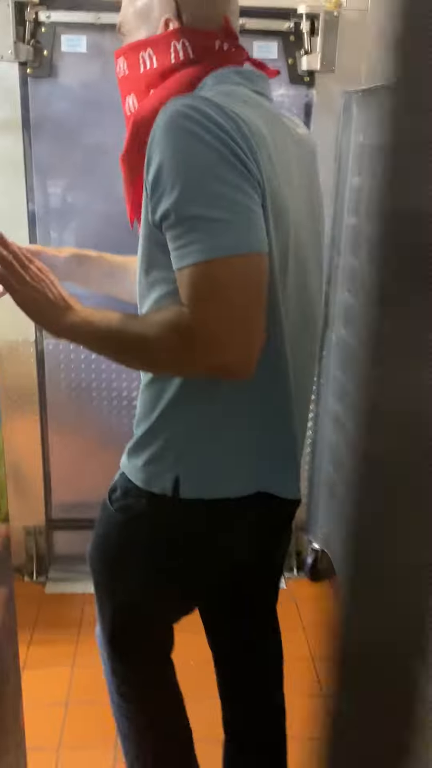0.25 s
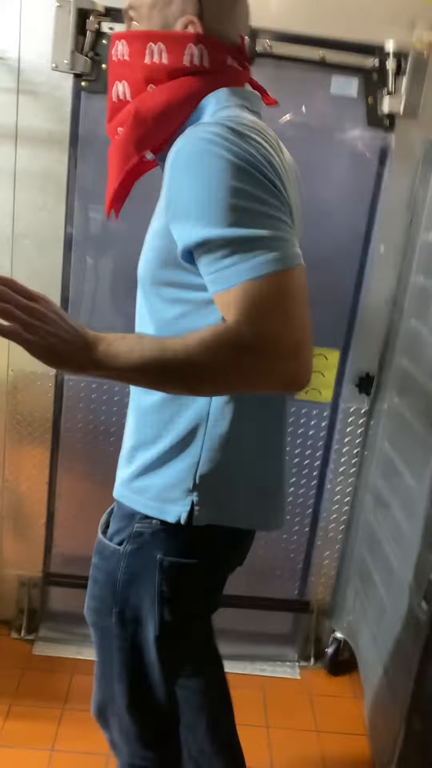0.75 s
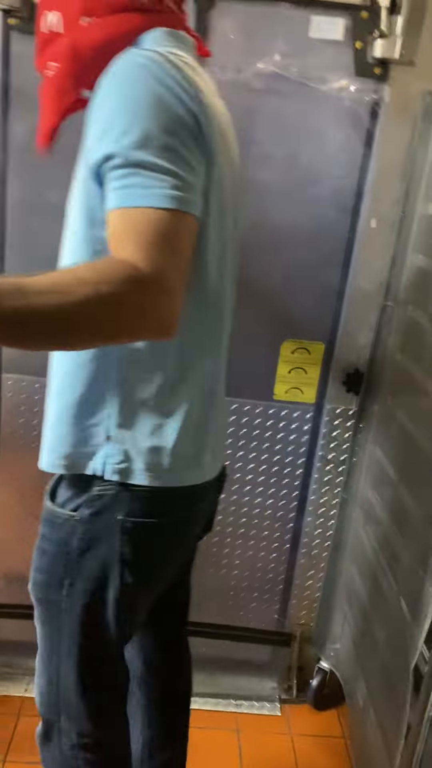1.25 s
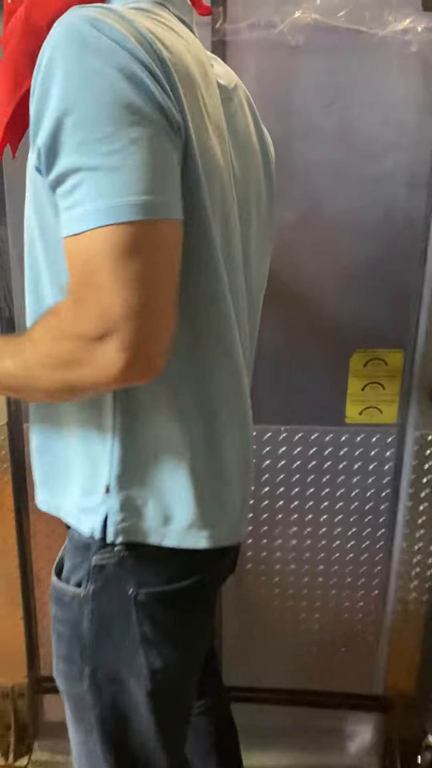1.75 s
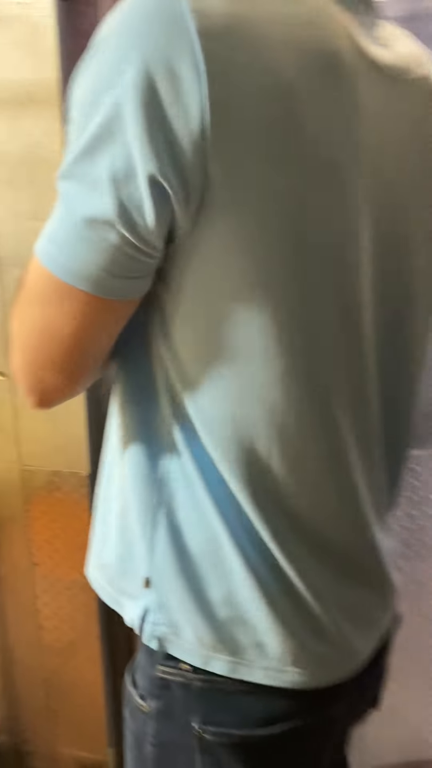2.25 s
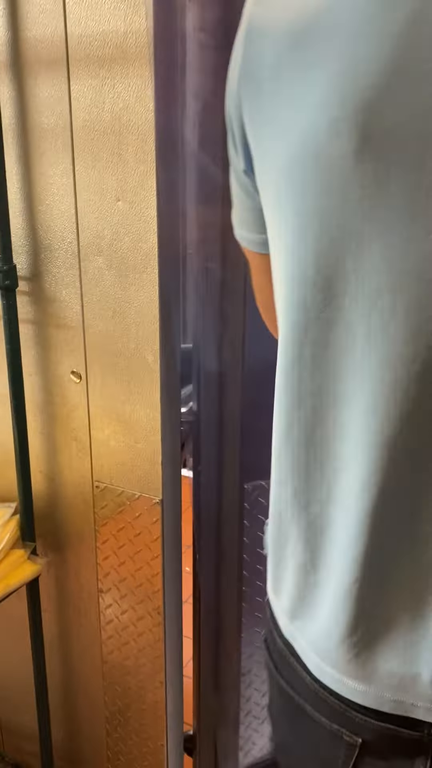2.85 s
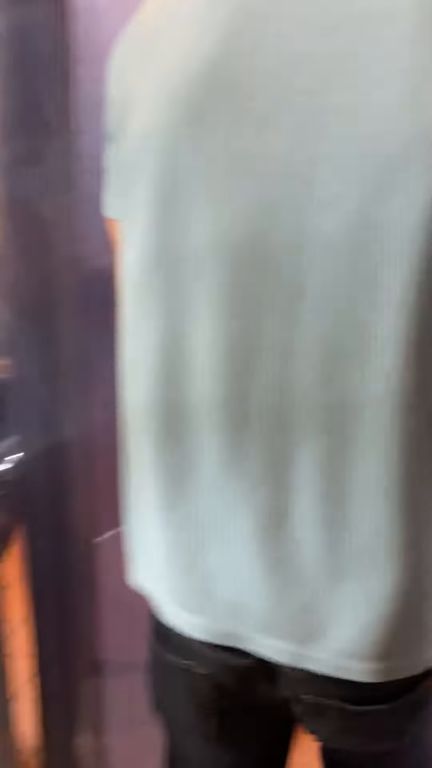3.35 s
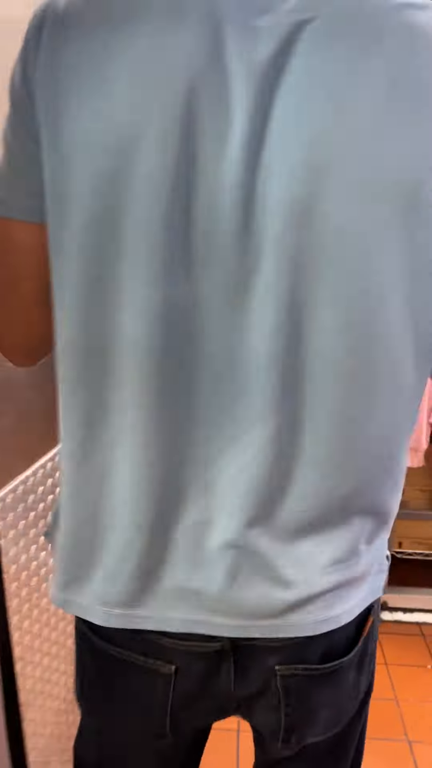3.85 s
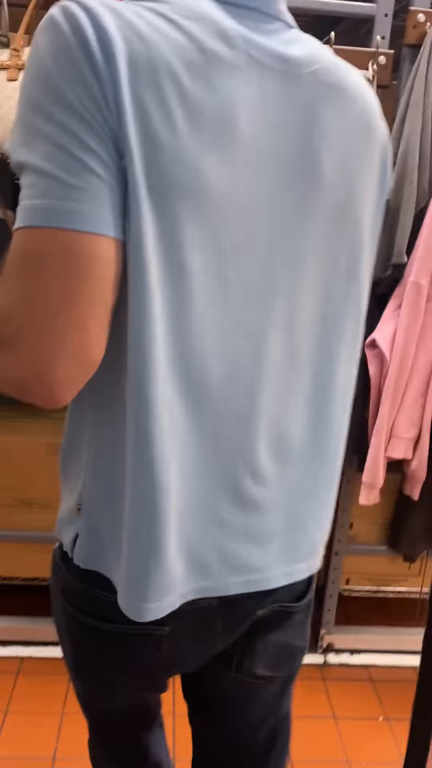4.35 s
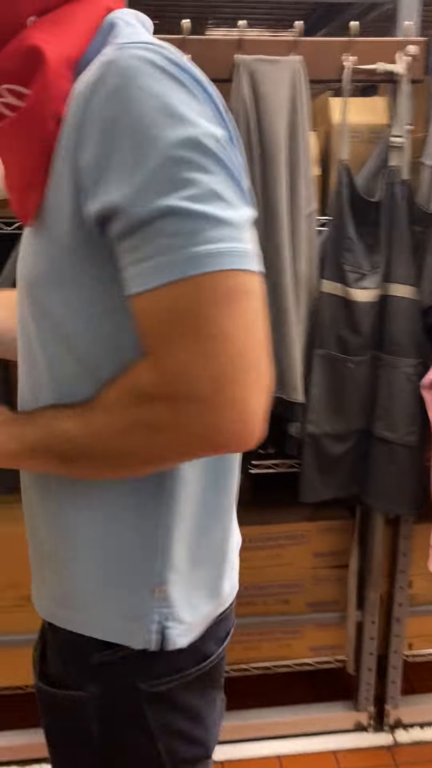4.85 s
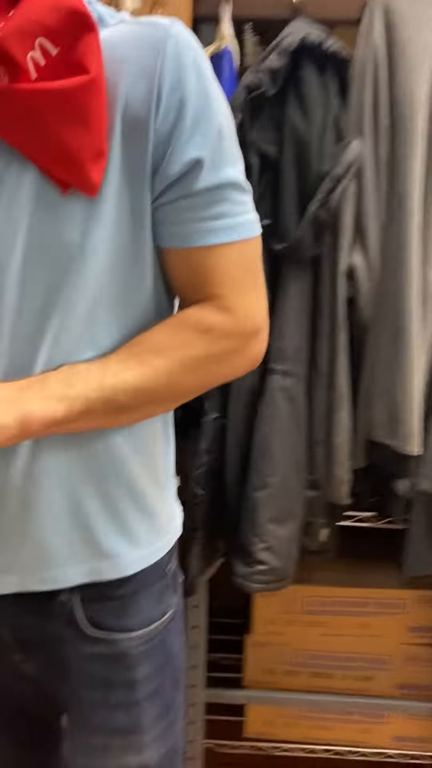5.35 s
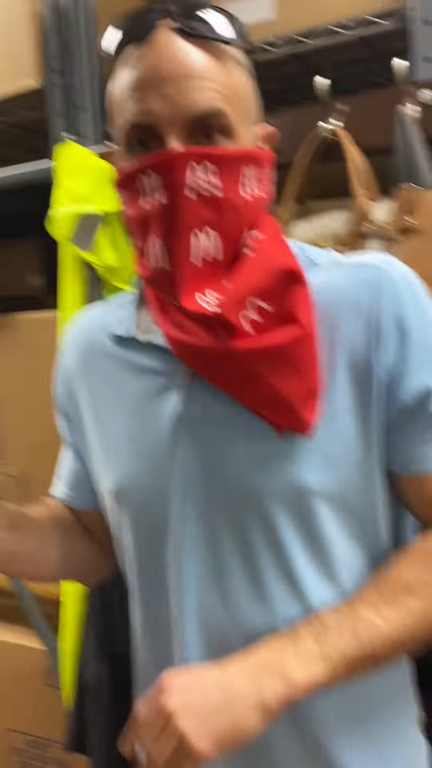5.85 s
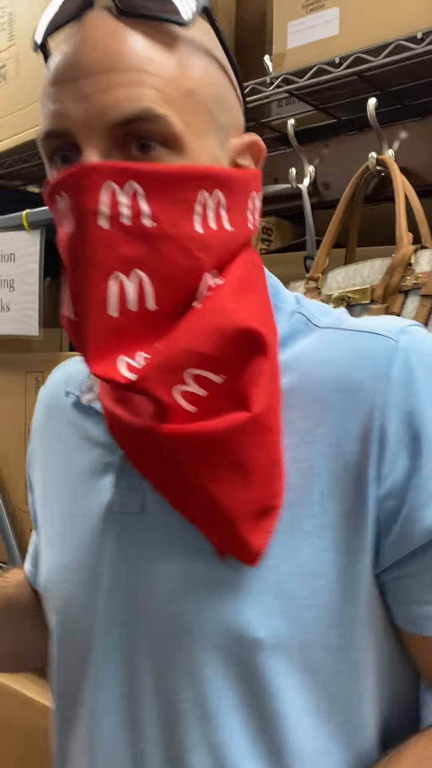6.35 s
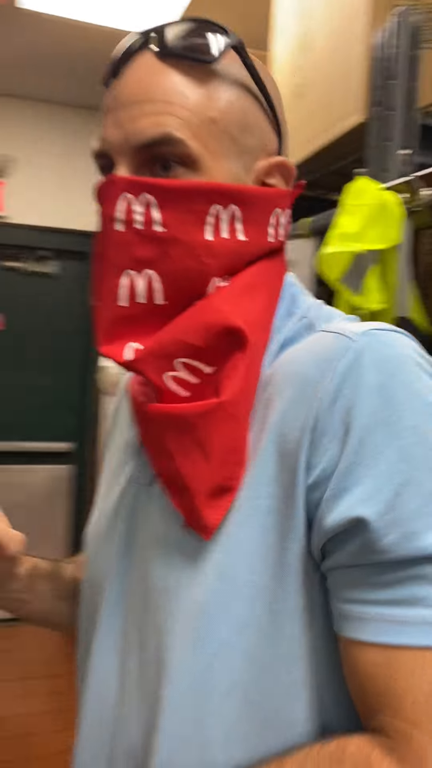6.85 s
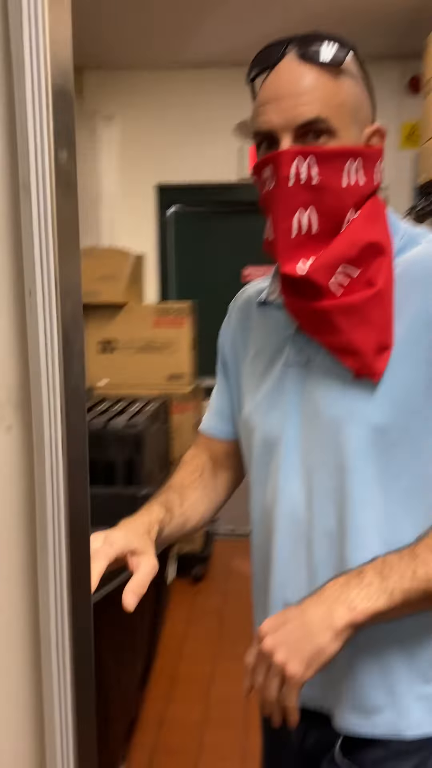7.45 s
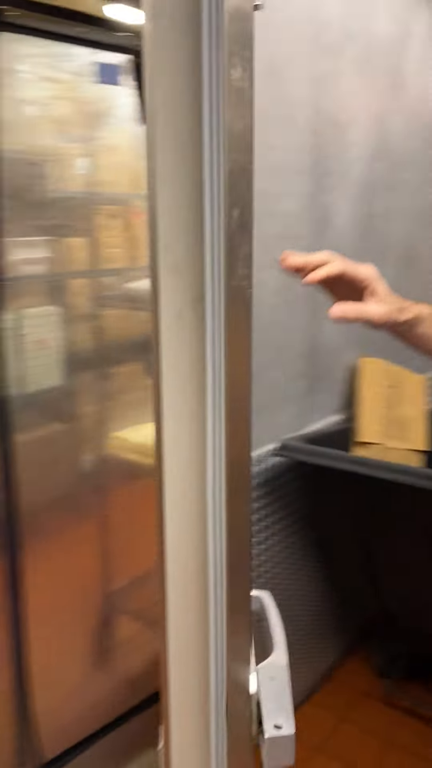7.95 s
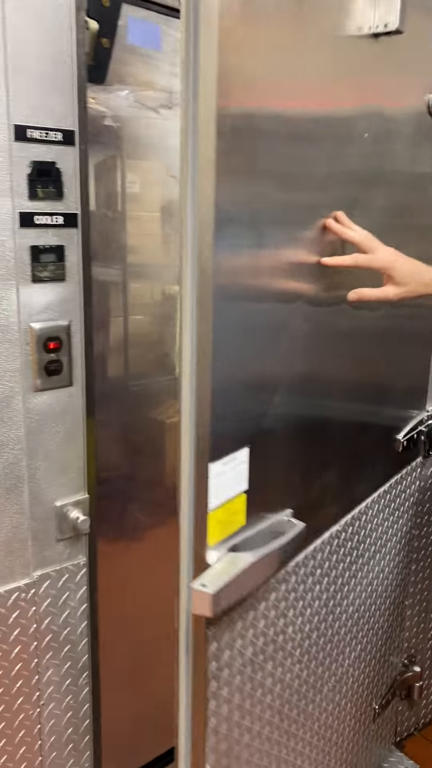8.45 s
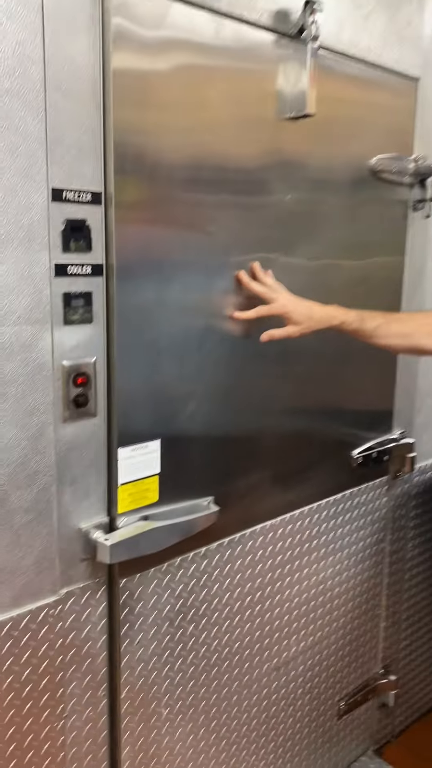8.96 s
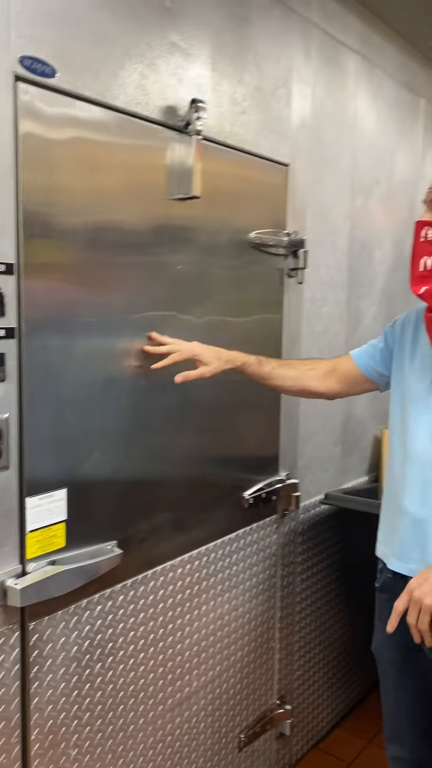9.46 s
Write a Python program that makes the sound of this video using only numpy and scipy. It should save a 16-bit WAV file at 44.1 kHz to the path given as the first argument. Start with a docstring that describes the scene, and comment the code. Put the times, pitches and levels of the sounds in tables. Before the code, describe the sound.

Steady low refrigeration hum with airy hiss, scattered door clanks, scuffs and ticks, then duller compressor throb and a heavy metal door booming closed.

```python
"""Evaporator fans and their motors hum in a walk-in freezer: wavering tones over banded noise for the air.
Someone pushes the heavy door open and walks out; struck hardware clanks through its own resonances and rings,
a hinge sings, shoes scuff and small things tick. With distance the hum and air roar fade, the compressors' beating
lines throb louder and faint machine whines come and go in the storeroom.
At the end the steel door swings shut and latches with a thump from its booming panel."""
import sys
import numpy as np
from scipy import signal
from scipy.fft import rfft, irfft, next_fast_len
from scipy.io import wavfile
from scipy.ndimage import uniform_filter1d

SR = 44100
rng = np.random.default_rng(int(sys.argv[2]) if len(sys.argv) > 2 else 0)


def store_pcm(level_fs):
    """Save levels as 16-bit WAV."""
    pcm = np.round(np.clip(level_fs, -1, 1) * 32767).astype(np.int16)
    wavfile.write(sys.argv[1], SR, np.atleast_2d(pcm).T)


N = 427769
TIME = np.arange(N) / SR
EDGES = np.geomspace(22, 17000, 26)  # borders of the noise bands, Hz
CENTRES = np.sqrt(EDGES[1:] * EDGES[:-1])
BLOW_SIZE = SR // 2  # samples kept of each blow
SHUT_S = 8.914  # the door meets its seal

# share of the storeroom in what the microphone hears: (time [s], share [0-1])
STOREROOM_SHARE = [(0, 0.02), (3.0, 0), (4.5, 0.04), (6.0, 0.92), (9.7, 1)]
# blows on the door hardware, treble against the middle:
# (time [s], relative level [dB], treble [dB], rise [s], part)
CLANKS = [ (0.209, -27.5, -12, 0.00081, "hinge pin"), (1.245, -13, -3, 0.0046, "frame"),
          (1.336, -24.5, -4.5, 0.0008, "push bar"), (1.350, -33.5, 4, 0.001, "push bar"),
          (1.363, -31, -2, 0.001, "push bar"), (2.042, -24, -13, 0.0021, "door skin"),
          (4.707, -22.5, -3, 0.008, "frame"), (4.750, -22, -0.5, 0.0011, "door edge"),
          (5.423, -26.5, 2, 0.0095, "frame"), (5.511, -23, 6, 0.00077, "handle"),
          (8.717, -22, 5, 0.0008, "closer"), (8.758, -24.5, -6.5, 0.00071, "closer"),
          (8.911, -19.5, -8.5, 0.0008, "latch"), (9.159, -22.5, -8, 0.00092, "bolt")]
# modes of the door's steel skin: (frequency [Hz], level against the blow [dB], t60 [s])
STEEL = [(1561, -22, .28), (2300, -16, .28), (2940, -19, 0.33), (3548, -17, 0.28), (4436, -26, .28),
         (5782, -24, .24), (6150, -23, .22), (7500, -24, 0.14)]


def fan_tones(fade_db):
    """Motor hum, blade tones and the shaken casing, screened by the wall outside and then by the shut door."""
    # blade tones of the fans: (multiple of the blade rate, level against the tone level [dB])
    blade_orders = [(1, 4.5), (3, -10), (4, -16)]
    # second blade tone, swelling and sinking through the room's standing waves:
    # (time [s], level against the tone level [dB])
    second_blade = [(0, -9), (.25, -0.5), (.5, -4), (.7, 0.5), (1.0, -0.5), (1.2, -9), (1.75, -9),
                    (2.1, -3.5), (2.65, 0), (3.2, -3.5), (3.55, -11), (3.95, -12), (4.25, 0), (4.9, -6.5),
                    (5.2, 5.5), (6.2, -2.5), (7.9, -6.5), (8.4, -2)]
    # evaporator casing, shaken by the motors: (frequency [Hz], level against the tone level [dB])
    casing_lines = [(48.5, -12.5), (73.2, -8), (92.7, -11), (147.5, -8), (281, -14.5), (315.2, -11),
                    (342.0, -11), (523, -25)]
    hum_hz, blade_hz = 120.0, 136.7
    # levels deep inside the freezer, dB; the hum loses more dB than the hiss does
    hum_inside_db, hum_follows, tones_inside_db = -14, 1.69, -31.5
    # further loss once outside, dB
    hum_wall_db, tones_doorway_db = -9.5, -5.5
    # the shut door muffles the tones: loss in dB, time the gap takes to close in s
    seal_db, seal_s = -10.5, 0.25

    outside, = in_time(STOREROOM_SHARE)
    # the walk starts in a quiet spot of the hum's standing wave, 8 dB deep
    quiet_spot_db = -8 * np.exp(-((TIME - 0.12) / 0.26) ** 2)
    hum_db = hum_inside_db + hum_follows * fade_db + hum_wall_db * outside + quiet_spot_db
    hum = from_db(hum_db) * tone(hum_hz, waver=.03, rate=1.5)

    blades = sum(from_db(db) * tone(k * blade_hz, waver=0.29 * k, rate=0.84 * k) for k, db in blade_orders)
    second_db, = in_time(second_blade)
    blades = blades + from_db(second_db) * tone(2 * blade_hz, waver=.55, rate=6)
    casing = sum(from_db(db) * tone(hz, waver=0.82, rate=2.4) for hz, db in casing_lines)
    tones_db = tones_inside_db + fade_db + tones_doorway_db * outside

    shut = np.clip(1 + (TIME - SHUT_S) / seal_s, 0, 1)
    return from_db(seal_db * shut) * (hum + from_db(tones_db) * (blades + casing))


def fan_air(fade_db):
    """Turbulent air: roar below, hiss above, changing colour on the way through the doorway."""
    # air noise in the freezer: (frequency [Hz], colour [dB per Hz])
    air_inside = [(25, -19), (45, 4.5), (100, 7), (200, 3), (300, 2), (450, -3.5), (750, -5.5),
                  (1100, -10.5), (1600, -13.5), (2300, -16.5), (5000, -20.5), (8000, -31)]
    # air noise in the storeroom: (frequency [Hz], colour [dB per Hz])
    air_outside = [(25, 0.5), (45, 8), (100, 11.5), (200, 1), (300, -4), (450, -5.5), (800, -8),
                   (1100, -13), (2000, -17), (4000, -21.5), (5500, -20.5), (8000, -33.5)]
    # sheen of the hiss at the very top: (frequency [Hz], lift [dB])
    air_top = [(3900, 0), (5100, -1), (6700, 1.5), (8700, 2.5), (11400, 0), (15000, .5)]
    roar_db, hiss_db = -57.0, -57.5  # deep inside the freezer, before the colour
    flutter_db, flutter_hz = 1.56, 11.4

    outside, = in_time(STOREROOM_SHARE)
    out = np.zeros((2, N))
    for noise, hz, width in zip(diffuse_bands(), CENTRES, np.diff(EDGES)):
        high = np.clip(np.log2(hz / 800) / 2, 0, 1)  # roar up to 800 Hz, all hiss from 3200 Hz
        level_db = (1 - high) * roar_db + high * hiss_db + fade_db
        colour_db = (1 - outside) * at_hz(air_inside, hz) + outside * at_hz(air_outside, hz)
        colour_db = colour_db + at_hz(air_top, hz)
        out += noise * np.sqrt(width) * from_db(level_db + colour_db + flutter_db * drift(flutter_hz))
    return out


def fan_fade():
    """Change of the fans' level in dB with distance, against the mean of the first two seconds."""
    # fans' hiss along the way out, of which only the changes count: (time [s], level [dB])
    fan_level = [(0.0, -40), (0.38, -42), (1.8, -42), (2.61, -44), (4.64, -47), (4.84, -47.5), (5.2, -49),
                 (7.47, -51), (8.6, -49.5)]
    level_db, = in_time(fan_level)
    return level_db - level_db[:2 * SR].mean()


def door(bands):
    """Hardware clatters with its own resonances and rings on; the panel booms as it meets the seal."""
    # struck metal and plastic parts, by name: (resonance [Hz], width [Hz], lift [dB])
    parts = { "frame": [(230, 60, 5.5), (500, 320, 5.5), (990, 200, 7), (2130, 250, 7.5), (3440, 400, 4.5)],
             "push bar": [(550, 90, 14), (970, 33, 8), (1750, 120, 5), (2220, 110, 15), (3170, 170, 9),
             (5030, 54, 8), (7500, 150, 11), (9300, 300, 2)], "door edge": [(245, 39, 7), (341, 27, 13),
             (503, 110, 8.5), (1150, 200, 8.5), (1490, 210, 13.5), (2360, 200, 9.5), (3000, 250, 11.5),
             (3600, 200, 10.5), (5840, 390, 11), (7900, 690, 7)], "handle": [(415, 29, 7), (620, 145, 15),
             (820, 110, 4), (980, 70, 9.5), (1350, 120, -5), (2270, 260, 8), (3670, 660, 5), (5060, 82, 7),
             (5800, 330, 6)], "closer": [(528, 22, 7.5), (744, 89, 5.5), (990, 810, 10.5), (4370, 200, 4.5),
             (5800, 80, 10), (7700, 100, 12)], "door skin": [(465, 55, 11.5), (585, 57, 15.5),
             (940, 100, 5)], "hinge pin": [(2190, 320, 20), (2740, 270, 3)], "latch": [(453, 61, 7),
             (1160, 150, 15), (1440, 110, 7.5), (1900, 150, 9), (2400, 220, 8.5), (3020, 220, 12),
             (6100, 250, 1), (8350, 600, 16)], "bolt": [(460, 86, 8.5), (860, 150, 5.5), (1150, 100, 7),
             (1500, 360, 11), (2120, 84, 15), (2660, 110, 14), (3180, 300, 10), (6350, 400, 13),
             (8000, 400, 8), (12000, 500, 6)], }
    # what rings on after each part is struck, by name: (frequency [Hz], level against the blow [dB], t60 [s])
    rings = { "door edge": STEEL, "closer": STEEL, "latch": STEEL, "bolt": STEEL, "push bar": [(533, 13.5, 0.13),
             (618, 7, .07), (2240, -1, 0.092), (3220, -5, .07)], "handle": [(437, -1, 0.1), (557, 4, 0.16),
             (693, -1, .11), (2240, -11, .15)], "door skin": [(467, 2, 0.11), (600, 4, .13)],
             "hinge pin": [(2230, 6, .05)], }
    # boom of the door panel: (frequency [Hz], level [dB], t60 [s])
    panel = [(41, -25, 0.89), (54.3, -16, 0.87), (100.4, -13, 0.16)]
    clatter_db = -12.0  # clatter against the ringing

    out = np.zeros((2, N))
    for s, db, bass, treble, top, rise_s, part in contacts(count=2):
        colour = [(50, bass - 10), (200, bass), (800, -1), (1700, treble / 2 - 4), (4000, treble),
                  (9000, (treble + top) / 2 + 2.5), (15000, top + 1)]  # (Hz, dB)
        band_db = db + clatter_db + at_hz(colour, CENTRES)
        clatter = blow(bands, s, band_db, rise_s, crack_t60=0.051, room_t60=0.26, room_db=-4.5, chatter_db=5.5)
        add(out, s, resonate(clatter, parts[part]))
    out = bend(out)
    for s, db, treble, rise_s, part in CLANKS:
        if part in rings:
            add(out, s, ringing(rings[part], db, scatter_db=1.0))
    boom = sum(ring(strikes([SHUT_S], from_db(db)), hz, t60) for hz, db, t60 in panel)
    return out + boom


def contacts(count):
    """Each blow, then weaker, duller rebounds in ever quicker succession, in the order door() unpacks them."""
    # colour of each part against the middle and loss at each rebound, by name: (bass [dB], top [dB], rebound [dB])
    part_colour = { "frame": (5.4, -9, -12), "push bar": (4.5, -5, -14.5), "door edge": (5.5, 5.8, -9),
                   "handle": (5.4, -12, -19), "closer": (2.5, 1.9, -6.5), "door skin": (0, -5, -9),
                   "hinge pin": (1, -38, -8.5), "latch": (7, -2, -18), "bolt": (2, -9, -22), }
    # time until each part first strikes again, by name: [s]
    first_rebound_gap = {"frame": .044, "push bar": .007, "door edge": .021, "handle": .028, "closer": .02,
                         "door skin": .014, "hinge pin": .02, "latch": .012, "bolt": .012}
    restitution = .65  # each gap as a share of the one before
    # a rebound is a softer contact: treble and top lost in dB, rise in s
    softer_treble_db, softer_top_db, softer_rise_s = -5, -42, 0.0046

    for s, db, treble, rise_s, part in CLANKS:
        bass, top, rebound_db = part_colour[part]
        yield s, db, bass, treble, top, rise_s, part
        for k in range(count):
            s = s + first_rebound_gap[part] * restitution ** k
            db = db + rebound_db
            yield s, db, bass, treble + softer_treble_db, top + softer_top_db, softer_rise_s, part


def ringing(modes, db, scatter_db):
    """A struck part rings on; the higher a mode, the more its phase differs between the ports."""
    t = TIME[:BLOW_SIZE]
    out = np.zeros((2, BLOW_SIZE))
    for hz, level_db, t60 in modes:
        gain = from_db(db + level_db + scatter_db * rng.standard_normal((2, 1)))
        turns = rng.random((2, 1)) * min(hz / 3000, 1)
        out += gain * envelope(0, t60) * np.sin(2 * np.pi * (hz * t + turns))
    return out


def bend(x):
    """Bending waves in the steel skin: lower pitches arrive later, so each blow slides downwards."""
    # lag two octaves below the top in s; range in which the lag grows in Hz
    lag_s, low_hz, top_hz = 0.001796, 199.4, 2490
    size = next_fast_len(x.shape[-1] + BLOW_SIZE)
    hz = np.fft.rfftfreq(size, 1 / SR)
    delay_s = lag_s * (np.sqrt(top_hz / np.clip(hz, low_hz, top_hz)) - 1)
    phase = 2 * np.pi * np.cumsum(delay_s) * SR / size  # delay is the slope of phase
    return irfft(rfft(x, size) * np.exp(-1j * phase), size)[..., :x.shape[-1]]


def bumps():
    """Firm, clean knocks: a well-damped body whose higher rings die first."""
    # knocks: (time [s], relative level [dB], pitch [multiple of the lowest knock's])
    pushes = [(1.854, -2, 2.1), (4.434, 2.5, 1), (4.976, -7, 1.9), (8.723, -7, 3.2), (8.739, 0.5, 1.3),
              (8.772, 1, 2.1), (9.169, -10, 1.9)]
    # resonances of the lowest knock: (frequency [Hz], level [dB], t60 [s])
    body = [(79.5, -16, 0.15), (215.4, -13.5, 0.052), (467, -21.5, 0.017), (930, -35, 0.012)]
    return sum(ring(strikes([s], from_db(level_db + db)), pitch * hz, t60)
               for s, level_db, pitch in pushes for hz, db, t60 in body)


def hinge():
    """A hinge sings briefly as the door is pushed wide: one sine whose pitch jitters and sinks."""
    # squeak: (time [s], frequency [Hz], level [dB])
    squeak = [(2.35, 817, -77), (2.45, 815, -41), (2.55, 776, -42), (2.6, 775, -47.5), (2.68, 763, -33),
              (2.76, 766, -50), (2.85, 764, -77)]
    hz, db = in_time(squeak)
    phase = 2 * np.pi * np.cumsum(hz * (1 + 0.0058 * drift(40))) / SR
    return np.sqrt(2) * from_db(db) * np.sin(phase)


def footfalls(bands):
    """Footfalls and soft bumps: narrow, dull bursts of noise with a strong room tail."""
    # steps and bumps: (time [s], relative level [dB], centre [Hz])
    steps = [(0.327, -27.5, 990), (.545, -25, 490), (.718, -23, 800), (1.262, -27, 950),
             (1.853, -19.5, 470), (2.905, -32, 895), (3.665, -32, 950), (5.425, -28.5, 1510),
             (5.882, -41, 1670), (5.889, -27, 470), (8.381, -35, 720), (8.735, -20, 338), (8.773, -20, 190),
             (8.80, -24.5, 260)]
    return taps(bands, steps, level_db=-3.5, skirt_db=15.5, rise_s=0.0023,
                crack_t60=0.069, room_t60=0.23, room_db=-3.0)


def fitting_ticks(bands):
    """Sharp ticks of plastic strips and fittings: very short, broad bursts of noise."""
    # ticks: (time [s], relative level [dB], centre [Hz])
    tick_rows = [(0.208, -19, 2300), (0.329, -20, 1090), (0.525, -12, 3450), (1.292, -17.5, 3000),
                 (1.341, -16, 2400), (1.351, -18, 2800), (1.643, -14, 2500), (2.445, -11.5, 7500),
                 (2.56, -22.5, 3300), (2.664, -22, 4970), (3.488, -20, 7980), (3.619, -13, 5800),
                 (4.200, -17, 6000), (4.201, -13, 1280), (4.751, -7, 7500), (4.975, -15.5, 1070),
                 (4.977, -23, 4000), (5.027, -22, 7940), (5.51, -15, 3500), (5.862, -34, 3170),
                 (5.915, -26, 5000), (6.083, -34, 4420), (6.427, -26.5, 3800), (8.718, -10, 8930),
                 (8.718, -13, 13000), (8.906, -13, 2000), (8.911, -8, 8550), (8.912, 0.5, 1340),
                 (9.145, -20, 2700), (9.159, -11.5, 7000)]
    return taps(bands, tick_rows, level_db=-9.5, skirt_db=6.5, rise_s=0.0012,
                crack_t60=0.013, room_t60=0.25, room_db=-16.5)


def brushing(bands):
    """Clothes and strips brushing past: broad noise that swells and dies slowly."""
    # swishes: (time [s], relative level [dB], centre [Hz])
    swish_rows = [(4.66, -30, 3500), (6.06, -43, 5000), (7.72, -39, 4300), (8.32, -39, 5000)]
    return taps(bands, swish_rows, level_db=-4.5, skirt_db=5.0, rise_s=0.061,
                crack_t60=0.46, room_t60=0.43, room_db=-6.0)


def compressors():
    """Compressors at slightly different speeds: low lines that beat against each other."""
    # compressor lines: (frequency [Hz], level against the throb [dB])
    compressor_lines = [(57.2, -3.5), (53, -13), (49.1, -9.5)]
    # throb along the way: (time [s], level [dB])
    throb_level = [(0, -47), (1.0, -41.5), (1.9, -29), (2.4, -39.5), (3.6, -29), (5.25, -32), (5.55, -24),
                   (6.9, -26), (7.3, -31), (9.7, -30)]
    throb_db, = in_time(throb_level)
    return from_db(throb_db) * sum(from_db(db) * tone(hz, waver=0.3, rate=0.84) for hz, db in compressor_lines)


def whines():
    """Thin, faint machine lines that come and go along the way through the storeroom."""
    # whines: (frequency [Hz], level against the whine level [dB])
    whine_lines = [(830, -3), (888, -9.5), (1505, 1), (1660, -6.5)]
    # whine along the way: (time [s], level [dB])
    whine_level = [(4.5, -87), (5.8, -60), (6.35, -61), (6.55, -53.5), (7.3, -61.5), (7.8, -55), (8.0, -62),
                   (8.48, -51), (9.1, -53.5), (9.7, -62)]
    whine_db, = in_time(whine_level)
    return from_db(whine_db) * sum(from_db(db) * tone(hz, waver=.45, rate=6) for hz, db in whine_lines)


def taps(bands, rows, level_db, skirt_db, rise_s, crack_t60, room_t60, room_db):
    """Light contacts, each strongest around its own pitch and falling by skirt_db an octave."""
    out = np.zeros((2, N))
    for s, db, hz in rows:
        band_db = db + level_db - skirt_db * np.abs(np.log2(CENTRES / hz))
        add(out, s, blow(bands, s, band_db, rise_s, crack_t60, room_t60, room_db, chatter_db=-3.0))
    return out


def blow(bands, s, band_db, rise_s, crack_t60, room_t60, room_db, chatter_db):
    """A chattering crack comes straight to both ports; a diffuse tail between hard walls follows."""
    start = round(s * SR)
    noise = sum(from_db(db) * band[:, start:start + BLOW_SIZE] for band, db in zip(bands, band_db))
    roughness = rms_one(uniform_filter1d(rng.standard_normal(BLOW_SIZE), size=70))
    # the first contact is clean; the parts chatter fully after 7.6 ms
    onset = np.minimum(TIME[:BLOW_SIZE] / 0.0076, 1)
    crack = noise[0] * envelope(rise_s, crack_t60) * from_db(chatter_db * roughness * onset)
    return crack + from_db(room_db) * noise * envelope(2 * rise_s, room_t60)


def envelope(rise_s, t60):
    """Energy builds up while the parts meet, then dies away."""
    t = TIME[:BLOW_SIZE]
    return (1 - np.exp(-t / max(rise_s, 1e-4))) * from_db(-60 * t / t60)


def add(out, s, sound):
    """Mix a sound in at its moment."""
    start = round(s * SR)
    out[:, start:start + BLOW_SIZE] += sound[:, :N - start]


def resonate(x, modes):
    """Each resonance in turn lifts its own narrow band."""
    for hz, width, db in modes:
        b, a = signal.iirpeak(hz, hz / width, fs=SR)
        x = x + (from_db(db) - 1) * signal.lfilter(b, a, x)
    return x


def strikes(times, sizes):
    """One impulse for each blow, on a tiny offset that keeps filters off denormal numbers."""
    out = np.zeros(N)
    np.add.at(out, np.round(np.asarray(times) * SR).astype(int), sizes)
    return out + 1e-18


def ring(clicks, hz, t60):
    """A unit click sets a decaying sine of height 1 ringing in a two-pole resonator."""
    r, w = from_db(-60 / (t60 * SR)), 2 * np.pi * hz / SR
    return signal.lfilter([0, np.sin(w)], [1, -2 * r * np.cos(w), r * r], clicks)


def tone(hz, waver, rate):
    """A steady line of unit rms ahead of the ports; shifting reflections make its strength and phase waver."""
    swing = (1 + waver * (drift(rate) + 1j * drift(rate))) / np.sqrt(1 + 2 * waver ** 2)
    carrier = np.exp(2j * np.pi * (hz * TIME + rng.random()))
    return np.sqrt(2) * np.real(swing * carrier) * ports(hz)


def drift(rate):
    """Slow chance with spread 1: noise through two equal poles at this rate in Hz."""
    r = np.exp(-200 * np.pi * rate / SR)  # drawn at every 100th sample
    slow = signal.lfilter([1], [1, -2 * r, r * r], rng.standard_normal(N // 100 + 2002))
    slow = slow[2000:]  # drop the filter's settling
    return np.interp(np.arange(N) / 100, np.arange(len(slow)), rms_one(slow))


def diffuse_bands():
    """Stereo noise in each band, as the two microphone ports pick up a diffuse field."""
    # likeness of the two ports: (frequency [Hz], correlation [-1 to 1])
    likeness = [(60, .99), (160, .98), (280, .94), (450, .5), (1000, .4), (3200, .3), (5600, .68),
                (8700, .97), (11500, .9), (14500, .65)]
    white, bands = rng.standard_normal((2, 2, N)), []
    for k, hz in enumerate(CENTRES):
        band_pass = signal.butter(2, EDGES[k:k + 2], "band", fs=SR, output="sos")
        mid, side = signal.sosfilt(band_pass, white[k % 2])  # neighbouring bands stay independent
        alike = np.clip(at_hz(likeness, hz), -.98, .998)
        stereo = np.sqrt(1 + alike) * mid + np.sqrt(1 - alike) * side * [[1], [-1]]
        bands.append(rms_one(stereo) * ports(hz))
    return bands


def ports(hz):
    """Left and right microphone gain at this frequency."""
    # balance of the ports: (frequency [Hz], left minus right [dB])
    balance = [(60, 0), (120, -2), (200, -4), (380, -6), (700, -1), (1250, 3), (2300, -1), (4400, -1),
               (9000, .3)]
    return from_db(at_hz(balance, hz) * np.array([[.5], [-.5]]))


def from_db(db):
    """Decibels to gain."""
    return 10 ** (np.asarray(db) / 20)


def rms_one(x):
    """Scale to unit rms."""
    return x / np.sqrt(np.mean(x ** 2) + 1e-20)


def in_time(rows):
    """Each column of a curve, sample by sample."""
    s, *columns = np.transpose(rows)
    return [np.interp(TIME, s, c) for c in columns]


def at_hz(points, hz):
    """Read a table on a log-frequency axis."""
    f, value = np.transpose(points)
    return np.interp(np.log(hz), np.log(f), value)


def scene():
    """Steady machinery with the door, steps and ticks on top."""
    fade_db = fan_fade()
    machines = fan_tones(fade_db) + fan_air(fade_db) + compressors() + whines()
    bands = diffuse_bands()
    door_sounds = door(bands) + bend(bumps()) + hinge()
    return machines + door_sounds + footfalls(bands) + fitting_ticks(bands) + brushing(bands)


def record(dry):
    """Sound reaches the left port first, and the recorder cuts off the top steeply."""
    # lead of the left port: (frequency [Hz], phase [rad])
    port_lead = [(250, 0), (450, .4), (850, 1.5), (1500, 1.2), (4400, 1.55), (7000, 2.25), (8500, 2.85),
                 (12000, 3.55), (15000, 4.5)]
    size = next_fast_len(N + BLOW_SIZE)
    lead = at_hz(port_lead, np.maximum(np.fft.rfftfreq(size, 1 / SR), 1))
    right = irfft(rfft(dry[1], size) * np.exp(-1j * lead), size)[:N]
    top_cut = signal.ellip(10, .2, 80, 15800, fs=SR, output="sos")  # ripple dB, stop dB, cutoff Hz
    return signal.sosfilt(top_cut, np.array([dry[0], right]))


dry = scene()
out = record(dry)
store_pcm(out)
```